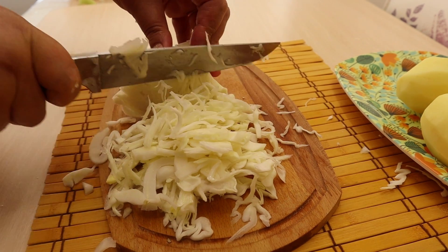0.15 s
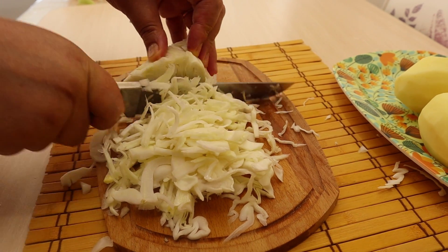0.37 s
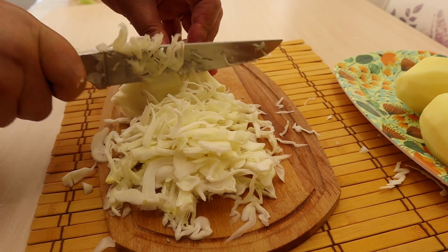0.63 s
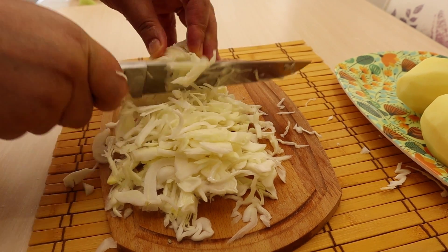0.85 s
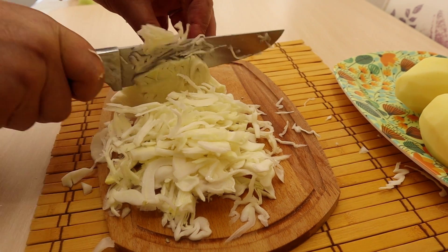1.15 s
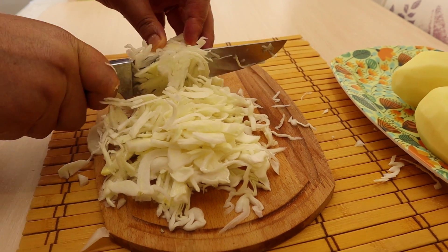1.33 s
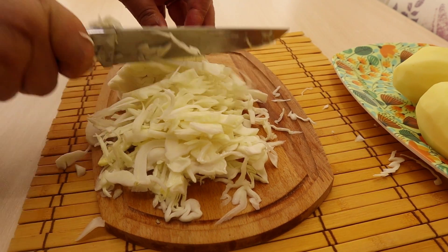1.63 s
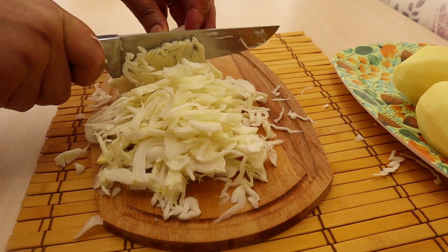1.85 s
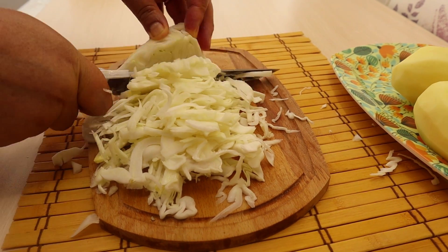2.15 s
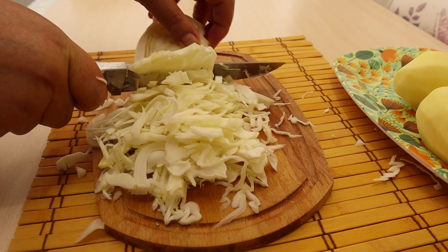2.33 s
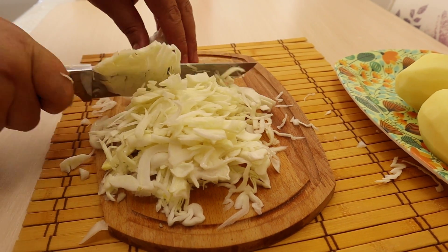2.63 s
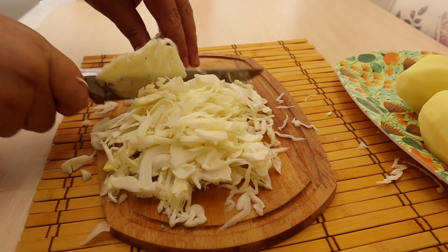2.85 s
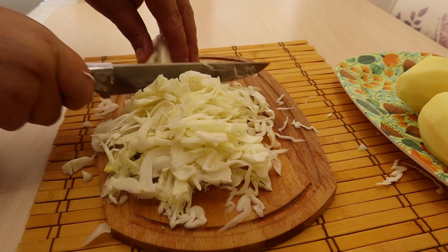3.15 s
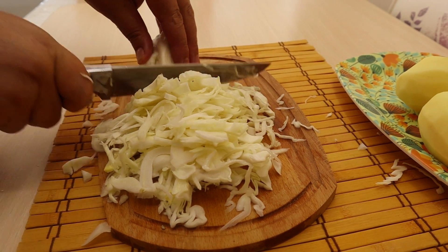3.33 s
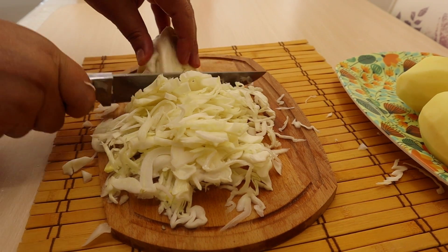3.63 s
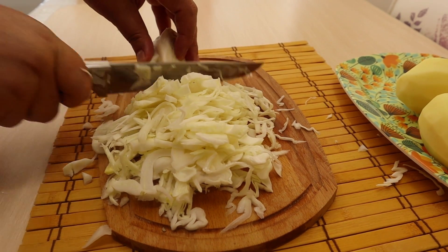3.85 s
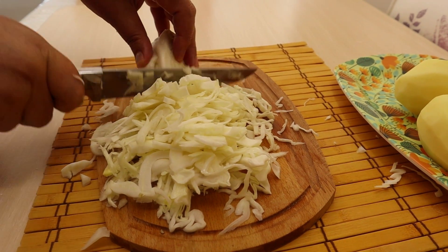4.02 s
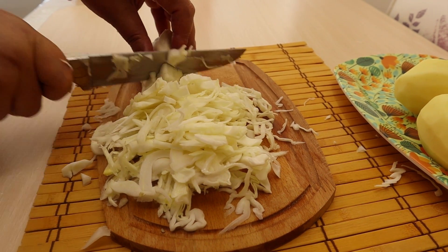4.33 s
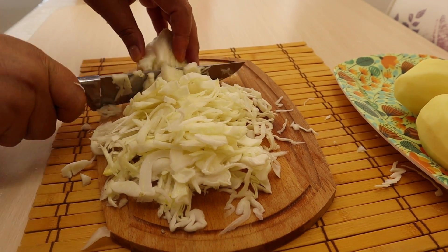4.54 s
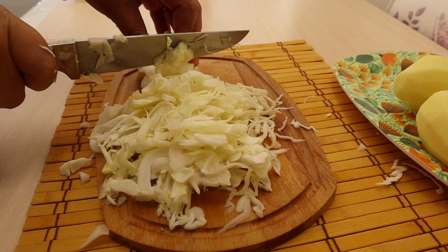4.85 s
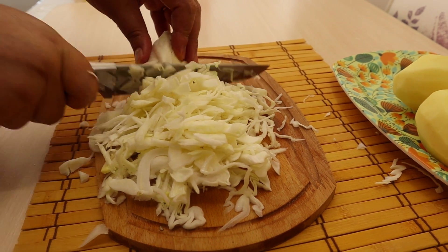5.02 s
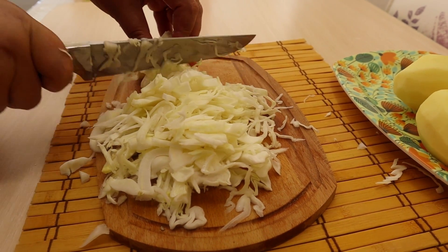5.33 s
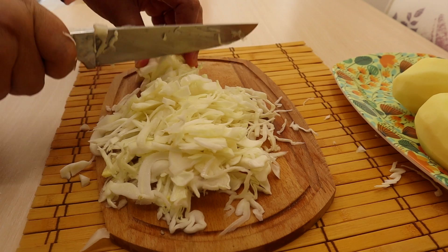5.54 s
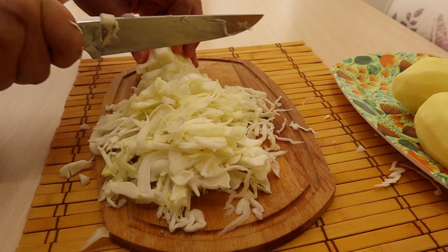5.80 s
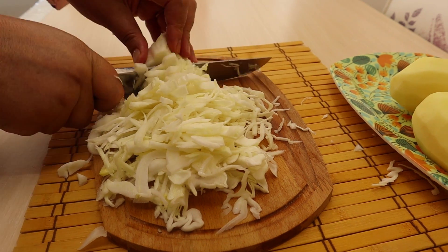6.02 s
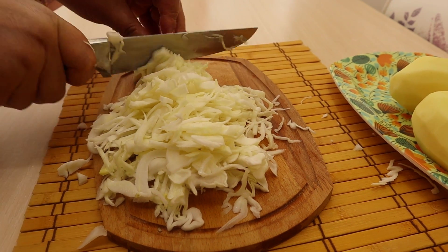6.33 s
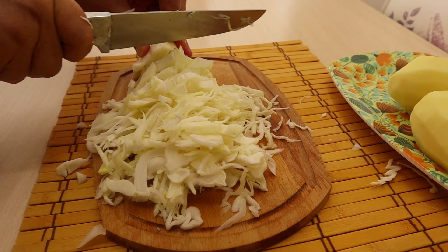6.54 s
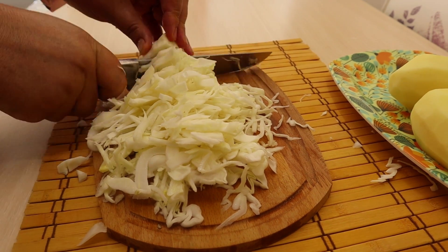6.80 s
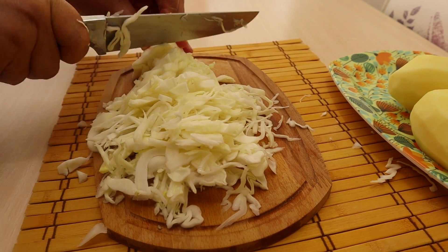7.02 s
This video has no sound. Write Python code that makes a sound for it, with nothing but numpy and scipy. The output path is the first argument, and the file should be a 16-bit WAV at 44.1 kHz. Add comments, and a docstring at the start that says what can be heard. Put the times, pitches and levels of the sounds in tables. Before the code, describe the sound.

A kitchen knife shreds cabbage on a wooden board, with crisp crunching cuts and short knocks of the blade on wood.

```python
"""Shredding cabbage on a wooden board

Leaf cells fracture as a kitchen knife sinks through them, and most strokes end in a knock on the wood.
The jerks of the cut drive the board's low modes; loose shreds rustle and snap in between.
The kitchen answers with a short reverberation, over a faint hush and mains hum."""
import sys
import numpy as np
from scipy import signal
from scipy.fft import rfft, irfft
from scipy.io import wavfile
from scipy.ndimage import uniform_filter1d

SR = 44100
rng = np.random.default_rng(int(sys.argv[2]) if len(sys.argv) > 2 else 0)


def unload_wav(signal):
    """Save mono or channel-first audio to the path in sys.argv[1] as 16-bit WAV at rate SR, clipped to [-1, 1]."""
    wavfile.write(
        sys.argv[1],
        SR,
        np.round(np.clip(np.atleast_2d(signal).T, -1, 1) * 32767).astype(np.int16),
    )


N = 316197

# the edge lands on the wood: t/s, relative level/dB, blade against wood/dB, echo share/dB
LANDINGS = [(0.3794, -19.5, -6, 9.5), (0.809, -20, -5.5, 7.5), (1.6037, -24, -24, 9),
            (2.119, -22.5, -8.5, 8.5), (2.7725, -22, -14, 8.5), (2.9739, -22, -6.5, 6.5),
            (3.1778, -24.5, -10.5, 5), (3.3248, -21, -7, 6.5), (3.517, -20, -5, 4.5),
            (3.679, -16, -5.5, 5.5), (3.886, -22.5, -7.5, 3), (4.0381, -19, -3.5, 0),
            (4.2561, -24, -5.5, 4), (4.4603, -31, -14, 5.5), (4.6054, -34, -21, 4.5),
            (5.0333, -10.5, 6, -1), (5.237, -13.5, 3.5, 0.5), (5.4873, -22.5, -9.5, 7.5),
            (5.7661, -12, 7, -4.5), (6.0619, -11, 8, -2), (6.4795, -12.5, 16, -0.5), (6.86, -10, 12, -8.5)]


def handling(bite_db=-65.5, still_db=-89.5, edge_s=0.0036, hop=32):
    """Incoherent sources add in power: strokes and swells sum to one level, the loudest sets the timbre."""
    # downward cuts: end t/s, length/s, end level/dB, swell exponent (1 = even), settling level/dB,
    # its fade/(dB/s), push on the board/dB, deep against hollow modes/dB, crispness/dB
    strokes = [(0.381, .19, -39, 1.66, -85, 200, -9, 10, -4),
               (0.816, 0.18, -40, 1.46, -71, 101, -12.5, 10, 3.5),
               (1.321, 0.21, -46.5, 3.2, -50, 500, -10.5, 21, 5.5),
               (1.431, 0.057, -41.5, 1.76, -51, 319, -12, 7, 6),
               (1.508, 0.051, -47, 1.5, -53, 166, -7.5, -2, 0.5),
               (1.605, 0.053, -33, 1.35, -63.5, 92, -12, 0, -1),
               (1.915, 0.074, -43, 0.82, -41.5, 206, -7.5, 8, 6.5),
               (2.118, .13, -31, 0.86, -72, 93, -8.5, 3, 1),
               (2.775, 0.11, -39, 0.77, -53, 260, -12.5, 13, 6),
               (2.974, 0.056, -45, 0.99, -56.5, 376, -6.5, -9, -7),
               (3.179, 0.069, -46.5, 1.7, -79, 50, -4, -1, -5.5),
               (3.328, 0.034, -44.5, 0.82, -70, 17, -6.5, 1, -3),
               (3.521, 0.057, -46.5, 1.13, -65.5, 127, -6.5, -23, -4.5),
               (3.681, 0.028, -43.5, 0.42, -59.5, 302, -5, -10, 0),
               (3.89, 0.068, -49, 3.4, -68, 402, -6.5, -1, 1),
               (4.255, 0.073, -49.5, 1.7, -71, 353, -7, -1, -0.5),
               (4.461, .088, -47, 2.33, -61.5, 39, -11.5, -14, 3),
               (4.617, .065, -54, 0.81, -61.5, 112, -5.5, 7, 0),
               (5.032, 0.091, -39, 1.12, -57, 199, -7, -6, 1.5),
               (5.237, 0.039, -50, 1.2, -74, 144, -9, -2, 9), (5.488, 0.11, -44, 1.87, -82, 98, -7, -25, 2),
               (5.77, 0.098, -46.5, 4.3, -59, 200, -9, -33, -3),
               (6.068, 0.13, -46, 2.9, -57, 200, -6, -9, -1),
               (6.485, .19, -43, 1.64, -63, 41, -7, -5, -0.5),
               (6.867, 0.15, -44, 2.16, -55.5, 105, -7, -17, -2.5),
               (7.19, 0.13, -47, 0.69, -60, 100, -4, -13, -3)]
    # brief swells of leaf noise: first a fading wash, the tail of a knock; then rustling shreds and
    # two short, faint cuts (2.59 s, 4.039 s): loudest t/s, level/dB, rise/(dB/s), fade/(dB/s)
    swells = [(0.001, -53.5, 107, 108), (0.47, -61, 206, 194), (0.63, -59, 372, 511),
              (0.926, -53.5, 132, 129), (1.813, -56.5, 900, 891), (2.226, -46.5, 213, 156),
              (2.467, -56.5, 51, 748), (2.59, -49.5, 1200, 330), (4.039, -54, 702, 450),
              (4.885, -60.5, 190, 256), (5.581, -61, 245, 577), (5.894, -61.5, 69, 500),
              (6.19, -59.5, 70, 398)]
    t, layers = np.arange(0, N + hop, hop) / SR, []
    bites = [end - length for end, length, *_ in strokes[1:]] + [np.inf]
    for (end, length, end_db, swell, settle_db, fade, *timbre), next_bite in zip(strokes, bites):
        left = np.clip((end - t) / length, 0, 1)
        cut = (left < 1) * undb(end_db + (bite_db - end_db) * left ** swell)
        settle = (t < next_bite) * undb(settle_db - fade * np.abs(t - end))
        layers.append((np.where(t < end, cut, settle), timbre))
    for s, db, rise, fade in swells:
        envelope = undb(db - np.where(t < s, rise * (s - t), fade * (t - s)))
        layers.append((envelope, (-16, -10, 15)))  # light push, hollow, crisp
    power = np.array([gain for gain, _ in layers]) ** 2 + undb(still_db) ** 2 / len(layers)
    total = power.sum(axis=0)
    timbres = np.array([timbre for _, timbre in layers]).T @ power / total
    tracks = np.vstack([10 * np.log10(total), timbres])  # level, push, depth, crispness
    tracks = uniform_filter1d(tracks, int(edge_s * SR / hop), axis=1)
    return [np.interp(np.arange(N) / SR, t, track) for track in tracks]


def crunch(level_db, crisp_db, faint_db=-65, dense_db=-45, faint_per_s=200, dense_per_s=5000):
    """Brittle fracture: cells burst faster under more effort, small ones ringing high, large ones low."""
    # spectrum of the breaking leaf: f/Hz, gain/dB
    leaf_spectrum = [(350, -26.5), (700, -22.5), (1700, -3), (2270, -9), (3160, 1), (5600, -4),
                     (9000, -4.5), (15100, -8), (16000, -3)]
    effort = np.clip((level_db - faint_db) / (dense_db - faint_db), 0, 1)
    rate = faint_per_s * (dense_per_s / faint_per_s) ** effort
    # each size of cell swells and fades on its own as the blade crosses ribs
    cells = sum(unit(ring(pops(rate / 3, 3.9), hz, 1.2 * hz)) * undb(3.3 * flicker(30))
                for hz in (1700, 7000, 12000))
    squeak = unit(ring(pops(rate, 3.2), 3440, 430)) * undb(5 * flicker(15))
    tear = (0.7 + 0.5 * effort) * rng.standard_normal(N)
    fracture = unit(pops(rate, 4.3) + 1.08 * unit(cells) + 0.18 * squeak + tear)
    stick_slip = undb(3 * flicker(220))  # the blade grabs and slips from rib to rib
    dull, crisp = split(unit(colour(fracture * stick_slip, leaf_spectrum)), 3600)
    return (crisp + dull * undb(-crisp_db)) * undb(level_db + 5.5)


def knocks(delay_s=0.0008):
    """Impact excites damped modes of wood and blade; gives the direct sound and impulses for the room."""
    # wood below 3 kHz, blade above: f/Hz, level/dB, T60/s
    modes = [(1363, -7.5, 0.0099), (1642, 1.5, 0.0043), (2120, 2, 0.0027), (2766, -6.5, 0.0055),
             (4240, 5, 0.0019), (6020, -12.5, 0.0084), (9140, -5, 0.0028), (12020, -15, 0.0072)]
    direct, impulses, t = np.zeros(N), np.zeros(N), np.arange(1024) / SR
    scatter = rng.standard_normal((len(LANDINGS), len(modes), 2)) * (1.5, 0.02)
    for (s, level_db, blade_db, echo_db), offsets in zip(LANDINGS, scatter):
        hit = 0
        for k, ((hz, db, t60), (scatter_db, detune)) in enumerate(zip(modes, offsets)):
            gain = (-1) ** k * undb(db + scatter_db + (blade_db if hz > 3000 else 0))
            hit = hit + gain * np.sin(2 * np.pi * hz * (1 + detune) * t) * 1000 ** (-t / t60)
        onset = s + delay_s  # the blow builds up a moment after first contact
        add(direct, onset, hit / np.max(np.abs(hit)) * undb(level_db + 5))
        impulses[int(onset * SR)] = undb(level_db + echo_db)
    return direct, impulses


def board(level_db, push_db, deep_db, bite_db=-55, growth=0.75):
    """Forced vibration: jerks of the cut drive the low modes of board and table."""
    # low modes: f/Hz, bandwidth/Hz, gain/dB
    modes = [(117, 94, -14.5), (231.2, 17, 5.5), (324.4, 40.5, 1), (411.7, 99, -5.5), (644, 630, -18.5)]
    # the force grows more slowly once the blade bites; mere rustling hardly loads the wood
    force_db = level_db - (1 - growth) * np.maximum(level_db - bite_db, 0)
    force_db += np.minimum(level_db - bite_db, 0)
    jerks = pops(900, 2.3) * undb(force_db + push_db + 23)
    # a deep cut leans on the modes under 350 Hz, a hollow one on those above
    return sum(undb(db + deep_db * np.log2(350 / hz) / 2) * ring(jerks, hz, width_hz)
               for hz, width_hz, db in modes)


def snaps(decay_s=0.0021, ring_hz=4200):
    """Sudden fracture: a rib breaks in a tiny burst of cracks, strongest in the low treble."""
    # single ribs and shreds breaking: t/s, peak level/dB
    breaks = [(0.116, -40), (0.132, -42), (0.147, -45.5), (0.193, -38.5), (0.352, -31), (1.071, -46),
              (1.0983, -35), (1.177, -27), (1.2064, -22), (1.4014, -22), (1.488, -34), (1.6715, -35),
              (1.739, -44.5), (1.879, -33.5), (1.9797, -28.5), (4.8321, -43), (4.84, -46), (4.856, -41.5),
              (4.902, -42.5), (5.1665, -50), (5.385, -43.5), (5.6225, -44.5), (5.67, -46), (6.61, -38),
              (6.697, -41), (6.747, -30.5)]
    out, t = np.zeros(N), np.arange(512) / SR
    for s, peak_db in breaks:
        cracks = rng.standard_normal(len(t)) * np.exp(-t / decay_s)
        burst = 0.29 * cracks + ring(cracks, ring_hz, 0.69 * ring_hz)
        add(out, s, burst / np.max(np.abs(burst)) * undb(peak_db))
    return out


def creaks(waver=0.051):
    """Friction: a thick rib groans along the blade in a short tone of rising, unsteady pitch."""
    # creaking ribs: t/s, length/s, start f/Hz, end f/Hz, peak level/dB
    groans = [(2.728, 0.04, 278, 352, -47.5), (2.938, 0.033, 435, 471, -47)]
    out = np.zeros(N)
    for s, length, from_hz, to_hz, db in groans:
        progress = np.linspace(0, 1, int(length * SR))
        wobble = np.interp(progress, np.linspace(0, 1, 16), rng.standard_normal(16))
        hz = (from_hz + (to_hz - from_hz) * progress) * (1 + waver * wobble)
        add(out, s, undb(db) * np.sin(np.pi * progress) * np.sin(2 * np.pi * np.cumsum(hz) / SR))
    return out


def plate(vibration):
    """Sympathetic resonance: a plate on the same table rings on faintly."""
    return undb(2) * ring(vibration, hz=464, width_hz=3.9)


def room(impulses, leaves, rise_s=0.016, low_t60_s=0.15, high_t60_s=0.12):
    """Reverberation: reflections from walls and cupboards gather, then die quickly, treble first."""
    # the wood radiates its middle modes into the room best: f/Hz, gain/dB
    radiation = [(200, -18), (300, -10), (1000, -10.5), (1400, -1.5), (2100, 0), (3000, -10.5), (6000, -15),
                 (16000, -43)]
    radiated = colour(impulses, radiation) * undb(9.5) + leaves * undb(-26)
    t = np.arange(SR // 2) / SR
    low, high = split(rng.standard_normal(len(t)), 2800)
    tail = low * 1000 ** (-t / low_t60_s) + high * 1000 ** (-t / high_t60_s)
    tail *= t ** 2 / (t ** 2 + rise_s ** 2)
    return signal.fftconvolve(radiated, tail / np.sqrt(np.sum(tail ** 2)))[:N]


def kitchen(hum_hz=100, dip_db=8, recovery_s=0.29):
    """Ambient noise: a faint hush with mains hum, whose level dips at every knock and creeps back."""
    # spectrum of the hush: f/Hz, gain/dB
    hush_spectrum = [(15, -47), (25, -2.5), (394, 2), (607, -5), (818, -5), (1130, -7), (3160, -14.5),
                     (3920, -30), (16000, -32.5)]
    t = np.arange(N) / SR
    since_knock = np.min([np.where(t >= s, t - s, np.inf) for s, *_ in LANDINGS], axis=0)
    hush = unit(colour(rng.standard_normal(N), hush_spectrum)) * undb(-68.5 + 1.2 * flicker(15))
    hum = undb(-84 + 1.5 * flicker(5)) * np.sin(2 * np.pi * hum_hz * t)
    return (hush + hum) * undb(-dip_db * np.exp(-since_knock / recovery_s))


def pops(per_s, spread_db):
    """Poisson process: random clicks, a few far larger than most, of even mean power at any rate."""
    hit = rng.random(N) < per_s / SR
    size = undb(spread_db * np.minimum(rng.exponential(size=N), 4))
    polarity = np.sign(rng.random(N) - 0.5)
    return unit(hit * size * polarity / np.sqrt(per_s))


def flicker(per_s):
    """Random modulation: values held 1 / per_s seconds and slewed."""
    hold = int(SR / per_s)
    return uniform_filter1d(rng.standard_normal(N)[np.arange(N) // hold], hold)


def ring(x, hz, width_hz):
    """Second-order resonance, gain 1 at its centre."""
    return signal.lfilter(*signal.iirpeak(hz, hz / width_hz, SR), x)


def colour(x, points, size=2048):
    """Minimum-phase filter through (f/Hz, gain/dB) points, made by folding the cepstrum."""
    hz, db = np.transpose(points)
    grid = np.maximum(np.arange(size // 2 + 1) * SR / size, 1)
    cepstrum = irfft(np.interp(np.log(grid), np.log(hz), db) * np.log(10) / 20)
    cepstrum[1:size // 2] *= 2
    cepstrum[size // 2 + 1:] = 0
    return signal.fftconvolve(x, irfft(np.exp(rfft(cepstrum))))[:len(x)]


def split(x, hz):
    """First-order crossover: the parts below and above a frequency."""
    low = signal.lfilter(*signal.butter(1, hz, fs=SR), x)
    return low, x - low


def add(out, s, sound):
    """Superposition: mix a short sound in at s seconds."""
    i = int(s * SR)
    out[i:i + len(sound)] += sound[:N - i]


def undb(db):
    """Decibels to amplitude ratio."""
    return 10 ** (np.asarray(db) / 20)


def unit(x):
    """Scale to rms 1."""
    return x / np.sqrt(np.mean(x ** 2))


def scene():
    """Superposition: direct sound, reverberation and background add in one channel."""
    level_db, push_db, deep_db, crisp_db = handling()
    leaves = crunch(level_db, crisp_db) + snaps()
    direct, impulses = knocks()
    echo = room(impulses, leaves)
    vibration = board(level_db, push_db, deep_db) + creaks()
    return (leaves + direct + vibration + plate(vibration) + echo + kitchen())[None]


def record(dry, ceiling=0.099, top_hz=15800):
    """Soft saturation rounds the loudest peaks; a steep low-pass limits the bandwidth."""
    rounded = ceiling * np.tanh(dry / ceiling)
    return signal.sosfilt(signal.ellip(10, 0.2, 60, top_hz, fs=SR, output="sos"), rounded)


dry = scene()
out = record(dry)
unload_wav(out)
```